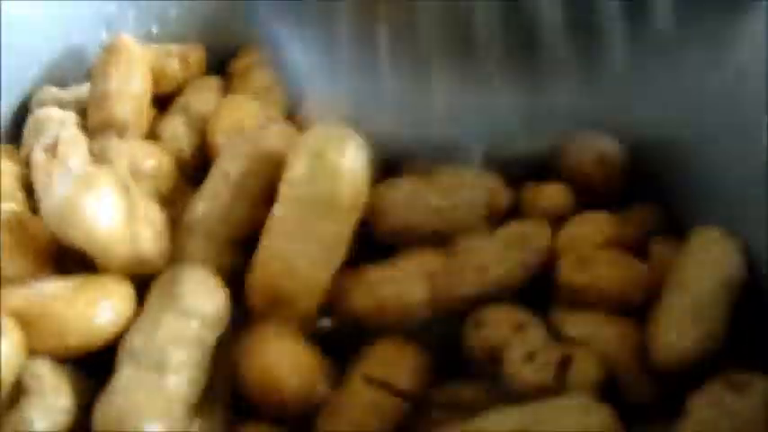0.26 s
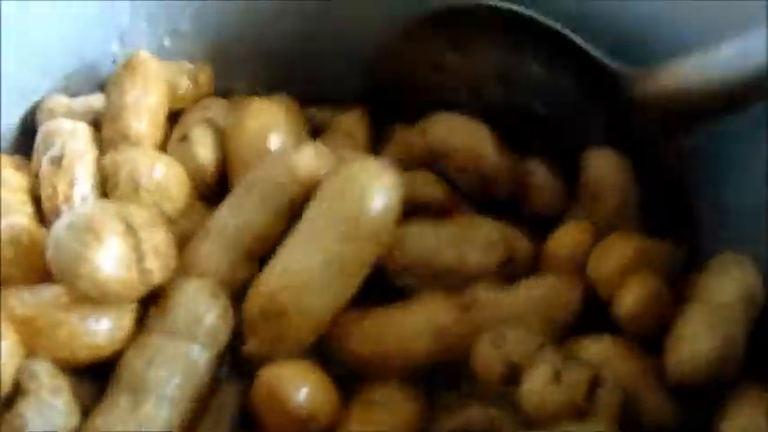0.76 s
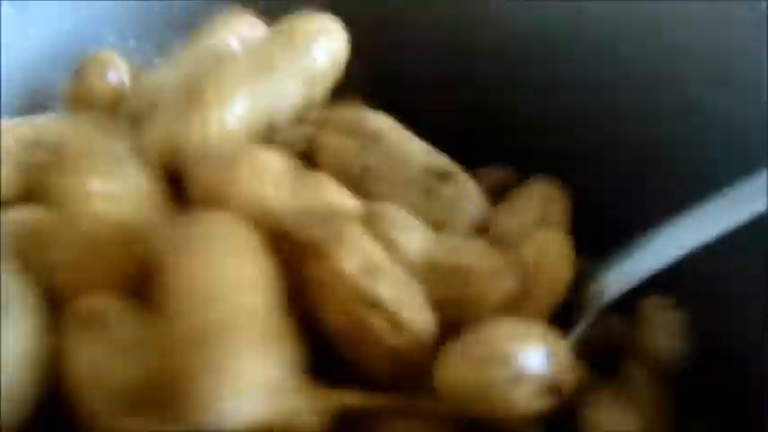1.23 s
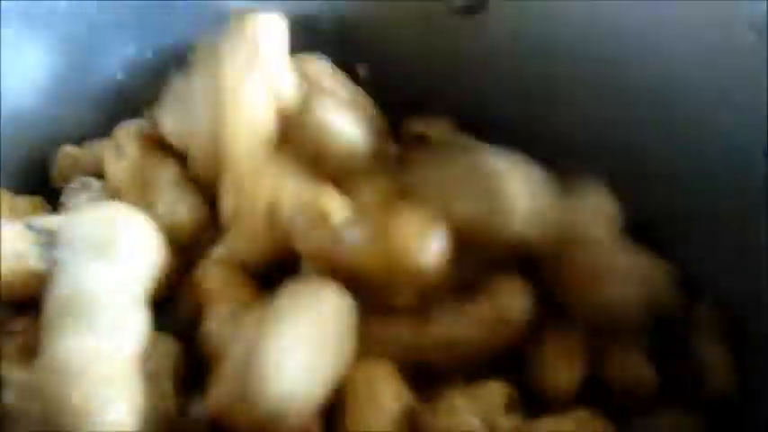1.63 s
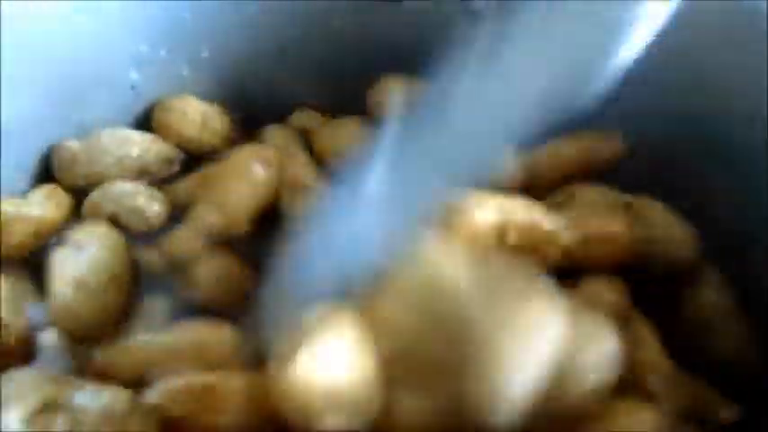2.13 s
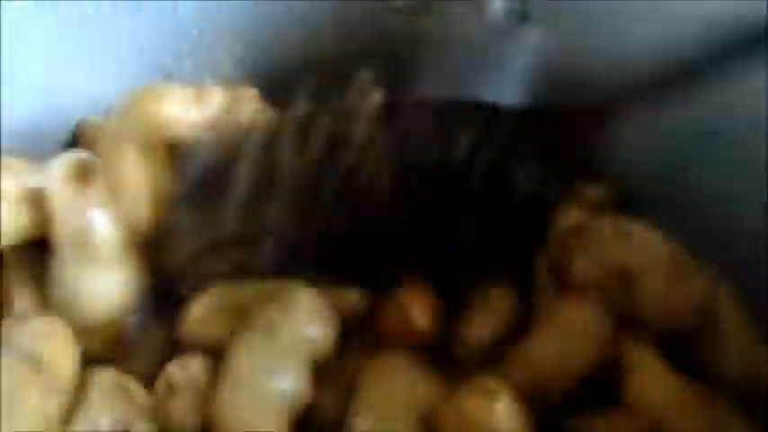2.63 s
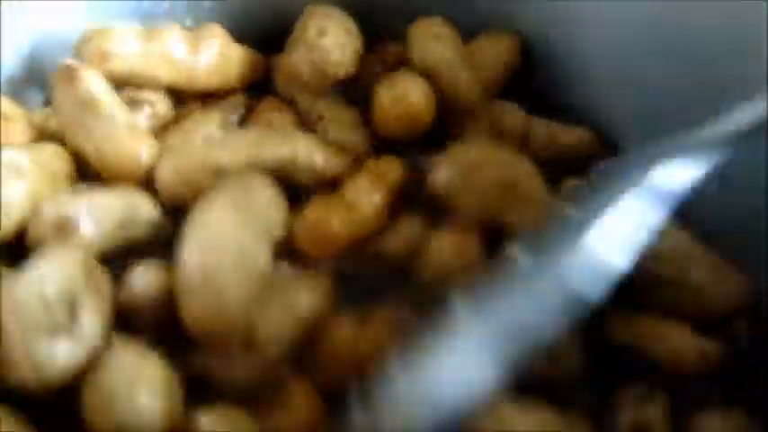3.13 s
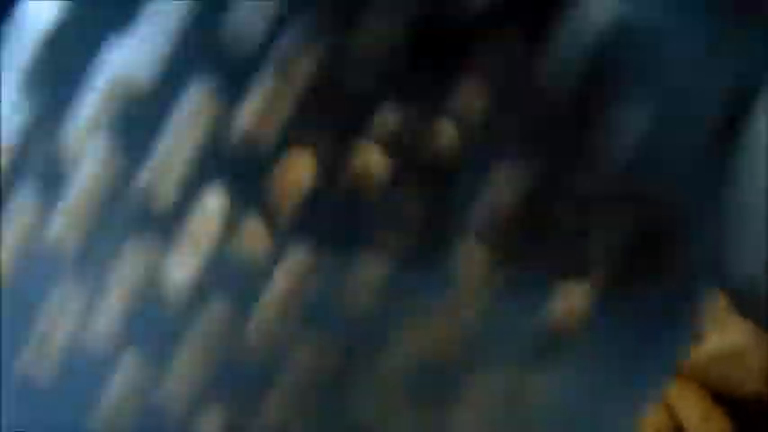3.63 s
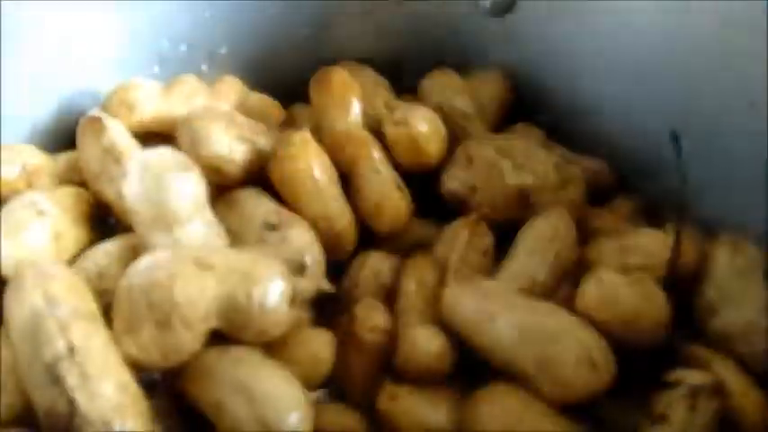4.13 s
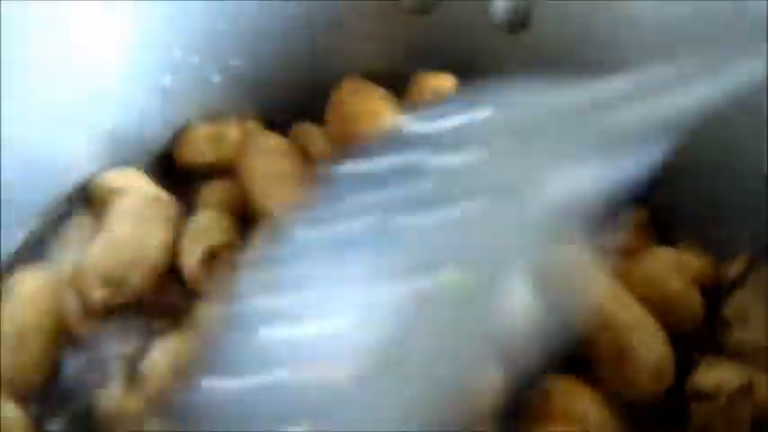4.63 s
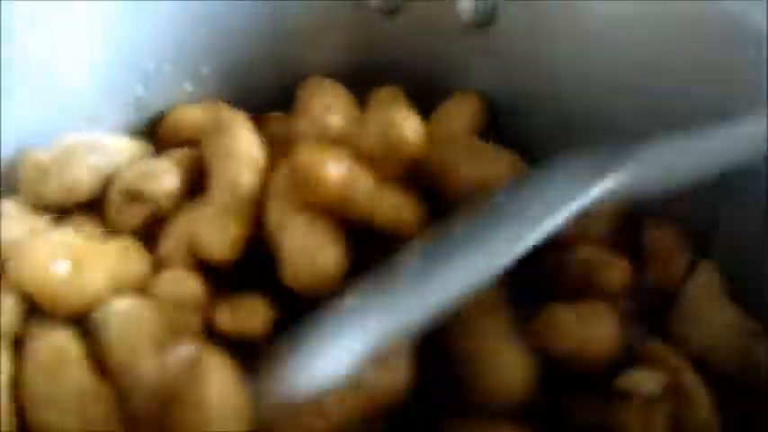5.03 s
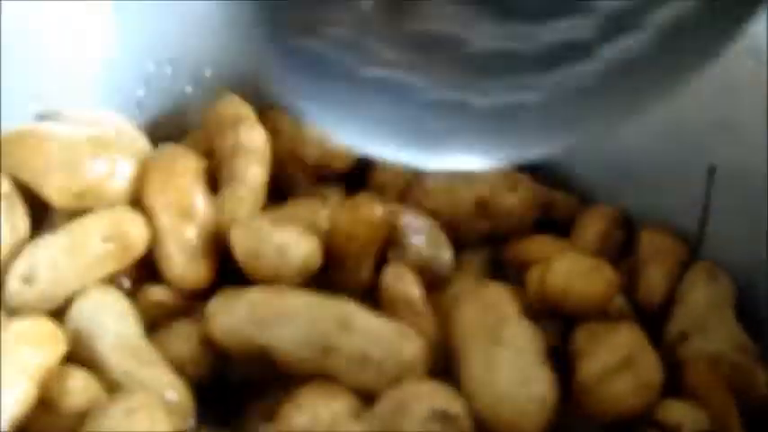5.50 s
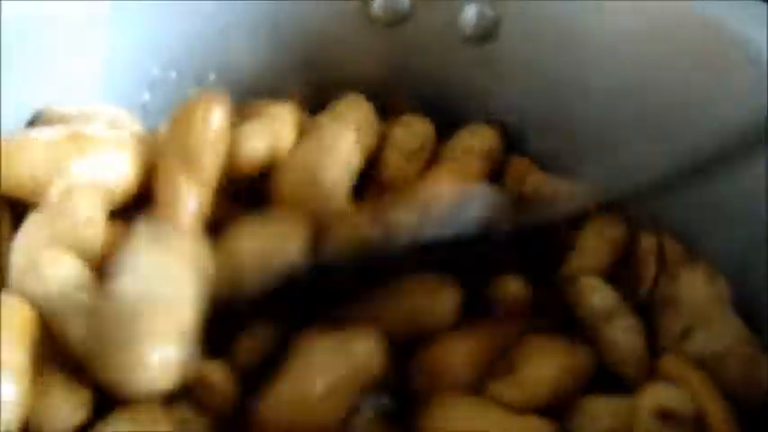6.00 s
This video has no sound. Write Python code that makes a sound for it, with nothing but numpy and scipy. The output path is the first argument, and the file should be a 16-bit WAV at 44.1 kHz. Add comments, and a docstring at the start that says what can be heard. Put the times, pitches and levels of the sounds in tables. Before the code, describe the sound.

Wet peanuts in their shells are stirred in a thin metal pot with a slotted metal spoon. Irregular strokes make grainy rattles and wet hisses; a very loud clang comes early, then softer stirring, two loud hollow knocks midway, another clank, and busy clustered knocking near the end. Close small microphone, slightly clipped, in a quiet kitchen.

```python
"""Wet peanuts in their shells rattle and hiss under a stirring spoon, and the thin metal pot hums low.
Hollow shells knock as short rings; the slotted metal spoon clangs on the wall as noise-driven modes.
Later come bright snaps of water film, each a tiny ring. Rattle and hiss are touches and noise that swell
with each stroke, the hum is a pair of wavering sines. A quiet kitchen lies behind: filtered noise and a
mains hum, with reflections on the blows. All of it is close to a small microphone."""
import sys
import numpy as np
from scipy import signal
from scipy.fft import rfft, irfft, next_fast_len
from scipy.io import wavfile

SR = 44100
rng = np.random.default_rng(int(sys.argv[2]) if len(sys.argv) > 2 else 0)


def materialize(psi):
    """Save the field psi as 16-bit PCM at rate SR to the path in sys.argv[1].

    A 1-D psi becomes a single channel; in a 2-D psi each row is a channel.
    """
    bounded = np.clip(np.atleast_2d(psi).T, -1, 1)
    quanta = np.round(bounded * 32767).astype(np.int16)
    wavfile.write(sys.argv[1], SR, quanta)


N = 276066

# Kitchen noise colours, relative: f/Hz, level/dB
ROOM_SPECTRUM = [(260, -47), (450, -8), (1060, -6), (1190, -4.5), (5190, -19.5), (13300, -23),
                 (14300, -28.5)]
RUMBLE_SPECTRUM = [(12, -28.5), (20, 7), (29, -10), (43, -13.5), (107, -16), (145, -21.5), (163, -13.5),
                   (203, -17.5), (232, -13.5), (264, -19.5), (450, -23), (580, -48.5), (990, -120)]
ROOM_DB, RUMBLE_DB = -66.5, -54.5
# Mains hum, level before it wavers: f/Hz, rms level/dB
MAINS_HUM = [(59, -79), (120, -67.5)]

# Spoon shoving the heap: full strength from t/s, hold/s, rattle level/dB, wet hiss level/dB
SHOVES = [(0.0, 0.022, -39.5, -46), (0.275, 0.033, -53.5, -60), (0.647, 0.049, -47.5, -54),
          (0.92, 0.045, -57, -56.5), (1.2, 0.07, -51.5, -58.5), (1.5, 0.013, -50, -57),
          (1.66, 0.042, -53.5, -57.5), (2.003, 0.16, -42.5, -47.5), (2.338, 0.079, -50, -52),
          (2.449, 0.06, -40, -46), (2.77, 0.031, -54.5, -62.5), (3.11, 0.031, -51, -55.5),
          (3.27, 0.13, -57.5, -62), (3.84, 0.031, -48, -48.5), (4.46, 0.07, -54, -55.5),
          (4.62, 0.062, -44, -49.5), (4.964, 0.069, -52, -46.5), (5.101, 0.096, -40, -46.5),
          (5.374, 0.09, -51, -55), (5.718, 0.042, -44, -45.5), (5.816, 0.013, -36, -46.5),
          (6.105, 0.039, -48.5, -50.5)]
SHOVE_RISE_DB_PER_S, SHOVE_FALL_DB_PER_S = (200, 200), (89.5, 78)  # rattle, hiss
# Colours of the shell rattle and the wet hiss, relative: f/Hz, level/dB
RATTLE_SPECTRUM = [(180, -44.5), (300, -4.5), (572, -9), (817, -2.5), (1750, -8.5), (2410, -17.5),
                   (3870, -19.5), (4710, -24), (7000, -27.5), (9100, -55.5), (15400, -120)]
HISS_SPECTRUM = [(1180, -35.5), (2000, -19), (2440, -0.5), (2940, -5.5), (3830, -8.5), (6230, -9.5),
                 (14300, -7)]
RATTLES_PER_S = 260  # before the density drifts

# Load jolting the pot into a hum: full strength from t/s, hold/s, upper level/dB, lower level/dB
JOLTS = [(0.0, .05, -43.5, -54), (0.05, 0.041, -46.5, -49.5), (0.66, 0.042, -55, -61.5),
         (1.0, 0.034, -59.5, -79), (1.55, 0.12, -59, -70), (1.75, 0.087, -61, -64),
         (2.09, 0.036, -53, -57.5), (2.4, .12, -49.5, -55), (2.53, 0.021, -47, -53),
         (3.1, 0.063, -53.5, -61), (3.23, 0.066, -54, -57.5), (3.77, .05, -53, -60),
         (4.45, 0.059, -61.5, -69), (4.65, 0.17, -57.5, -65.5), (4.95, .03, -56, -62),
         (5.07, 0.029, -50.5, -66), (5.15, 0.069, -58, -49), (5.4, 0.047, -58, -65),
         (5.78, 0.024, -41, -68), (5.84, 0.024, -39.5, -51), (6.15, 0.042, -65.5, -58)]
JOLT_RISE_DB_PER_S, JOLT_FALL_DB_PER_S = (700.5, 701.5), (89, 59.5)  # upper, lower hum
POT_HUM_HZ = (101, 237.5)  # the two low pot modes that hum
THUD_HZ, THUD_T60_S = 342, .075  # the pot mode that thuds

# Shells knocking: t/s, level/dB, shell f/Hz, then relative crack level/dB, tick level/dB, thud level/dB
KNOCKS = [(0.014, -26.5, 730, -13, -21, -9), (0.031, -30.5, 1400, 5.5, -22, -15),
          (0.07, -32.5, 651, -5, 3, -4), (0.244, -35.5, 920, -30, -26, -15),
          (0.691, -32.5, 690, -0.5, 8.5, -8), (0.74, -36, 727, -1, 4, -11), (1.161, -45, 734, 2, 0, -23),
          (1.394, -38, 1270, -36.5, -18.5, -15.5), (1.516, -35, 1220, -18, -9.5, -43),
          (1.66, -32, 914, -13, -29.5, -23), (1.695, -30, 1485, -16, -29.5, -26),
          (1.725, -36.5, 1400, -13, -26, -33), (1.878, -35.5, 1500, -25.5, -2.5, -22),
          (1.971, -30.5, 703, -21.5, -2, -25), (2.09, -19.5, 660, -18, -30, -6),
          (2.35, -49, 937, 11.5, -8, -17), (2.42, -38, 1050, -8, 7, -21), (2.451, -31, 710, -4, -12, -14),
          (2.464, -25.5, 1100, -15, -17, -3.5), (2.472, -16.5, 1160, 4.5, -2.5, -20),
          (2.486, -25.5, 1100, -9, -22, -31), (2.504, -38, 1000, 17.5, -6, -14),
          (2.533, -3, 827, -8, -44, -12.5), (2.569, -24.5, 800, -21.5, -7.5, 2),
          (2.825, -42, 1380, -19, -18.5, -20.5), (2.986, 0, 768, -9, -19.5, -25),
          (3.226, -18.5, 740, -34, -29.5, -4.5), (3.1345, -37.5, 937, -21, -29, -29.5),
          (3.705, -39, 900, -18, -24.5, -21.5), (3.766, -25, 595, -20.5, -30, -13),
          (4.624, -24.5, 703, -5, 0.5, -11), (4.929, -36, 1103, -1.5, -5, -17),
          (5.043, -31, 770, -22, -17, -17.5), (5.082, -38, 1100, -19, -21, -28),
          (5.105, -26.5, 1520, -14, -20, -27), (5.128, -26, 930, -8, -21, -20),
          (5.151, -21.5, 880, -20, -19, -26), (5.169, -25, 840, -11, -20, -22),
          (5.189, -29, 967, 5.5, -19, -29), (5.222, -28.5, 884, 0, -21, -24),
          (5.233, -35, 1410, 0, -10, -22), (5.374, -29.5, 1030, -28, -15, -19),
          (5.436, -37.5, 1310, -27, -12.5, -21.5), (5.681, -29.5, 926, -1.5, -3, -13.5),
          (5.725, -34.5, 1620, -2, 5.5, -25), (5.748, -31, 1030, -15, -21, -13),
          (5.776, -22, 726, -8.5, -27, -10), (5.829, -16, 1030, 1.5, -10, -34),
          (5.848, -23, 830, 3.5, -5, -25), (6.091, -39.5, 1010, -5.5, -17, -26),
          (6.241, -37, 1390, -15, -5.5, -8.5)]
KNOCK_CHATTER_S = .0015
SHELL_T60_S, SHELL_REFERENCE_DB = .034, -40  # ring time of a knock at the reference level
SHELL_DAMPS = .02  # octaves of ring time lost per dB above the reference
BODY_DB = -6  # broad body under the shell's ring
CRACK_HZ, CRACK_SPREAD_OCT = 2600, 0.083  # centre and spread of crack pitch

# Spoon on the pot wall: t/s, level/dB, then relative knock level/dB, brightness/dB,
# shiver level/dB, shiver t60/s (at least 0.02)
CLANGS = [(0.383, -45.5, -11, 7, -5, 0.13), (0.48, -0.5, -33, 6.5, -5.5, 0.056),
          (0.4968, 7.5, -45, 6, -13.5, 0.09), (0.504, 1.5, -34.5, 2, -11.5, .06),
          (0.5104, -4.5, -39, -0.5, -13, 0.1), (0.6631, -5.5, -15, 7, -6, 0.016),
          (0.8788, -26.5, -22, 5.5, -15, 0.1), (0.8865, -16, -23, -2, -18, .19),
          (0.948, -30, -33, -2, -5, 0.42), (1.045, -28, -23.5, -1.5, -12, .08),
          (2.088, -11.5, -2.5, -5, -6.5, .05), (2.3012, -20.5, -6.5, -6, -24, .071),
          (2.5107, -13.5, -31, -3.5, -15.5, 0.14), (2.7594, -32, 1.5, -2, -12, 0.087),
          (2.9891, -20, -2, 5.5, -20.5, 0.0974), (3.355, -30, -11.5, -8.5, -29, 0.058),
          (3.3623, -22, -28, -27.5, -16.5, .08), (3.7635, -1.5, -14, -22.5, -10.5, 0.098),
          (4.354, -29.5, -12, -9.5, -14.5, .06), (4.4533, -13.5, -8, -0.5, -11.5, 0.14),
          (4.6069, -38, -15, -7.5, -12, .087), (4.968, -20.5, -22, -1.5, -28.5, .061),
          (5.2505, -23, -14, -5, -15, 0.18), (5.4834, -30, -13, -1, -23, .08),
          (6.033, -31, -5.5, 2.5, -11, 0.071)]
# Spoon modes, t60 for a 0 dB blow: f/Hz, level/dB, t60/s
SPOON_MODES = [(1440, -8, .05), (2290, -16, .05), (2900, -8, .07), (3316, -11, .08), (3930, -8, .08),
               (4194, -3, .09), (4630, -13, .05), (5200, -11, .06), (5790, -5, .045), (5900, -7, .05),
               (6035, -5, .07), (6600, -7, .06), (7300, -10, .05), (7890, 0, .065), (8371, -8, .06),
               (8850, -8, .06), (9500, -10, .04), (10060, -9, .04), (10775, -3, .06), (11300, -11, .04),
               (12000, -11, .04), (12900, -8, .05), (13300, -4, .05), (13555, -4, .05), (13740, -7, .05)]
CLANG_CHATTER_S = 0.0017
RING_DB, RING_GROWS = -21, .12  # ring level at a 0 dB blow, dB gained per dB of blow
TILT_FOLLOWS = .7  # ring tilt per dB of brightness
RING_SHORTENS = .012  # octaves of ring time lost per dB below 0: light touches come from a buried spoon
WALL_DB, WALL_T60_S = -8.5, 0.059  # the wall's many modes

# Kitchen reflections: f/Hz, t60/s
KITCHEN_T60 = [(200, 0.65), (1000, 0.27), (4000, 0.39), (12000, 0.13)]
CLANG_ROOM_DB, KNOCK_ROOM_DB = -15.5, -23.5  # the deep pot shields the knocks

# Water films snapping: t/s, peak level/dB, f/Hz
SNAPS = [(1.2957, -40, 11600), (1.4277, -42.5, 13060), (1.592, -44, 7760), (1.632, -42, 8440),
         (1.7968, -38.5, 11000), (1.9274, -37, 13900), (2.1874, -34, 12900), (2.5835, -22, 14200),
         (2.7743, -34, 8260), (2.963, -39.5, 13230), (3.197, -36, 13900), (5.1616, -31, 12000),
         (5.6241, -46, 10600), (6.0835, -36, 12700), (6.1422, -35, 9200)]

MIC_HZ, CUTOFF_HZ = 14550, 15800  # where each steep low-pass reaches its full rejection


def from_db(db):
    """Turn dB into gain."""
    return 10 ** (np.asarray(db) / 20)


def rms_one(x):
    """Scale to rms 1."""
    return x / np.sqrt(np.mean(x ** 2) + 1e-20)


def peak_one(x):
    """Scale to peak 1."""
    return x / np.max(np.abs(x))


def at_hz(points, hz):
    """Read a table on a log-frequency axis."""
    points = np.array(points)
    return np.interp(np.log(hz), np.log(points[:, 0]), points[:, 1])


def colour(x, spectrum):
    """Shape a sound by a spectrum; rms 1."""
    size = next_fast_len(N)
    hz = np.maximum(np.arange(size // 2 + 1) * SR / size, 1)
    shaped = rfft(x, size) * from_db(at_hz(spectrum, hz))
    return rms_one(irfft(shaped, size)[:N])


def drift(rate_hz):
    """A slow random wander of rms 1: noise through two equal low-pass poles."""
    r = np.exp(-2 * np.pi * rate_hz / SR)
    noise = rng.standard_normal(N + SR)
    return rms_one(signal.lfilter([1], [1, -2 * r, r * r], noise)[SR:])  # skip the filter's start


def ring(x, hz, t60):
    """A resonant mode: a unit click sets a decaying sine of height 1 ringing."""
    r = from_db(-60 / (max(t60, .002) * SR))
    w = 2 * np.pi * min(hz, SR / 2.2) / SR
    return signal.lfilter([0, np.sin(w)], [1, -2 * r * np.cos(w), r * r], x + 1e-18)


def passed(x, hz, kind):
    """Second-order Butterworth design."""
    return signal.sosfilt(signal.butter(2, hz, kind, fs=SR, output="sos"), x)


def add(track, s, sound):
    """Mix a sound in at a time in seconds."""
    i = round(s * SR)
    track[i:i + len(sound)] += sound[:N - i]


def contact(length, size):
    """Chattering surfaces: a noise burst that holds briefly, then dies fast on a bell curve."""
    t = np.arange(size) / SR
    return rng.standard_normal(size) * np.exp(-(t / max(length, .0003)) ** 2)


def swells(rows, rise_db_per_s, fall_db_per_s):
    """Levels in dB over time: each row swells, holds and dies; their powers add."""
    t = np.arange(0, N + 64, 64) / SR
    power = 1e-30
    for s, hold, *levels in rows:
        rise_loss = np.outer(rise_db_per_s, np.maximum(s - t, 0))
        fall_loss = np.outer(fall_db_per_s, np.maximum(t - s - hold, 0))
        loss = rise_loss + fall_loss
        power = power + from_db(np.array(levels)[:, None] - loss) ** 2
    return [np.interp(np.arange(N) / SR, t, 10 * np.log10(row)) for row in power]


def background():
    """Quiet kitchen: low rumble, fine noise and a mains hum of slightly wavering level."""
    t = np.arange(N) / SR
    hum = sum(np.sqrt(2) * from_db(db + 1.6 * drift(7.1)) * np.sin(2 * np.pi * hz * t)
              for hz, db in MAINS_HUM)
    rumble = from_db(RUMBLE_DB) * colour(rng.standard_normal(N), RUMBLE_SPECTRUM)
    air = from_db(ROOM_DB) * colour(rng.standard_normal(N), ROOM_SPECTRUM)
    return air + rumble + hum


def touch_sizes(spread_db):
    """Uneven touches: random strength, capped, with either sign."""
    return from_db(spread_db * np.minimum(rng.exponential(1, N), 3)) * rng.choice([-1, 1], N)


def rattle(level_db):
    """Many small shell touches, each a short ring at one of 24 pitches, over a noisy rub."""
    sizes = touch_sizes(3.7)
    touches = sizes * (rng.random(N) < RATTLES_PER_S * from_db(4 * drift(10)) / SR)
    dealt = rng.integers(0, 24, N)  # which pitch each touch gets
    rings = np.zeros(N)
    for k, hz in enumerate(np.geomspace(400, 6500, 24)):
        gain = from_db(at_hz(RATTLE_SPECTRUM, hz) + 6.6 * np.log2(hz))  # lifts the shorter high rings
        rings += gain * ring(touches * (dealt == k), hz, 12.0 / hz)
    rub = colour(rng.standard_normal(N), RATTLE_SPECTRUM) * from_db(3.5 * drift(30))
    return from_db(level_db) * rms_one(rms_one(rings) + .9 * rub)


def hiss(level_db):
    """Wet surfaces slide: bright noise, and a fine crackle of drops as clicks and tiny rings."""
    sizes = touch_sizes(4.2)
    drops = sizes * (rng.random(N) < 150 / SR)
    dealt = rng.integers(0, 12, N)
    pops = sum(ring(drops * (dealt == k), hz, .005)
               for k, hz in enumerate(np.geomspace(3500, 13500, 12)))
    ticks = sizes * (rng.random(N) < 200 / SR)
    slide = rng.standard_normal(N) * from_db(1.0 * drift(30))
    return from_db(level_db) * colour(slide + 0.46 * rms_one(ticks) + 0.14 * rms_one(pops), HISS_SPECTRUM)


def pot_hum(low_db, high_db):
    """Two low pot modes under the stirred load: sines whose phase and level wander."""
    t = np.arange(N) / SR
    low, high = (np.sqrt(2) * np.sin(2 * np.pi * hz * t + .7 * drift(3)) * from_db(1.5 * drift(8))
                 for hz in POT_HUM_HZ)
    return from_db(low_db) * low + from_db(high_db) * high


def knocks():
    """A hollow shell rings a few cycles, with a short crack and tick; the thud goes into the pot."""
    out = np.zeros(N)
    for s, level_db, shell_hz, crack_db, tick_db, thud_db in KNOCKS:
        t60 = SHELL_T60_S / 2 ** (SHELL_DAMPS * (level_db - SHELL_REFERENCE_DB))
        touch = contact(KNOCK_CHATTER_S, size=SR // 4)
        touch += .18 * np.roll(touch, round(rng.uniform(0.0022, 0.006) * SR))  # a small bounce

        shell = peak_one(ring(touch, shell_hz, t60) + .55 * ring(touch, shell_hz * 1.55, t60 * 0.5))
        body = peak_one(passed(touch, [shell_hz * .75, shell_hz * 2.1], "band"))
        crack_hz = CRACK_HZ * 2 ** (CRACK_SPREAD_OCT * rng.standard_normal())
        crack = peak_one(ring(touch, crack_hz, t60 * .2))
        crack += .8 * peak_one(passed(touch, [1200, 4200], "band"))
        tick = peak_one(passed(contact(KNOCK_CHATTER_S * 2.0, size=SR // 4), 5000, "high"))
        thud = peak_one(ring(passed(touch, 1300, "low"), THUD_HZ, THUD_T60_S))

        knock = shell + from_db(BODY_DB) * body + from_db(crack_db) * crack
        knock += from_db(tick_db) * tick + from_db(thud_db) * thud
        add(out, s, from_db(level_db) * knock)
    return out


def clang_ring(drive, level_db, bright_db):
    """Metal modes driven by the blow: the spoon's own, and a random wall set for each spot struck."""
    metal = np.zeros(len(drive))
    for hz, db, t60 in SPOON_MODES:
        mode_db = db + rng.normal(0, 2.5) + TILT_FOLLOWS * bright_db * hz / 14000
        mode_t60 = t60 * 2 ** (RING_SHORTENS * level_db)
        metal += from_db(mode_db) * peak_one(ring(drive, hz, mode_t60))
    for hz in rng.uniform(2500, 14000, 30):
        metal += from_db(WALL_DB) * peak_one(ring(drive, hz, WALL_T60_S))
    return from_db(RING_DB + RING_GROWS * level_db) * metal


def clangs():
    """Each blow is a broad crack and the thin wall's dense shiver, which keeps the spoon's modes going."""
    out = np.zeros(N)
    t = np.arange(SR // 4) / SR
    for s, level_db, knock_db, bright_db, shiver_db, shiver_t60 in CLANGS:
        touch = contact(CLANG_CHATTER_S, size=SR // 4)
        shiver = passed(rng.standard_normal(SR // 4), 780, "high")
        shiver *= from_db(-60 * t / max(shiver_t60, .02))
        drive = touch + from_db(shiver_db) * shiver

        crack = peak_one(passed(drive, [2300, 6500], "band"))
        crack += from_db(bright_db + 7.0) * peak_one(passed(drive, 6000, "high"))
        knock = from_db(knock_db) * peak_one(passed(drive, [900, 2500], "band"))
        metal = clang_ring(drive, level_db, bright_db)
        add(out, s, from_db(level_db) * (0.52 * crack + knock + metal))
    return out


def kitchen(x):
    """Reflections: octave bands of noise, each dying at its own rate after a short gap."""
    t = np.arange(SR) / SR
    edges = 150 * 2. ** np.arange(8)
    echo = np.zeros(SR)
    for low, high in zip(edges, edges[1:]):
        band = passed(rng.standard_normal(SR), [low, high], "band")
        echo += band * from_db(-60 * t / at_hz(KITCHEN_T60, low * np.sqrt(2)))
    echo *= np.clip((t - .004) / .012, 0, 1)  # silent gap, then a fade-in
    return signal.fftconvolve(x, echo / np.sqrt(np.sum(echo ** 2)))[:N]


def snaps():
    """Each water film snaps as a tiny bright ring excited by a very short noise burst."""
    out = np.zeros(N)
    for s, peak_db, hz in SNAPS:
        snap = peak_one(ring(contact(0.00061, size=SR // 20), hz, 0.0049))
        add(out, s, from_db(peak_db) * snap)
    return out


def scene():
    """Blows with their room, the stroke and the background."""
    rattle_db, hiss_db = swells(SHOVES, SHOVE_RISE_DB_PER_S, SHOVE_FALL_DB_PER_S)
    high_db, low_db = swells(JOLTS, JOLT_RISE_DB_PER_S, JOLT_FALL_DB_PER_S)
    metal, shells = clangs(), knocks()
    room_feed = from_db(CLANG_ROOM_DB) * metal + from_db(KNOCK_ROOM_DB) * passed(shells, 900, "high")
    blows = passed(metal + shells + kitchen(room_feed), 230, "high")
    stroke = rattle(rattle_db) + hiss(hiss_db) + snaps() + pot_hum(low_db, high_db)
    return (blows + stroke + background())[None]


def record(dry):
    """The microphone band ends steeply, peaks beyond full scale clip, then the top is cut."""
    mic_band = signal.cheby2(14, 45, MIC_HZ, fs=SR, output="sos")
    top_cut = signal.cheby2(12, 60, CUTOFF_HZ, fs=SR, output="sos")
    clipped = np.clip(signal.sosfilt(mic_band, dry), -1, 1)
    return signal.sosfilt(top_cut, clipped)


dry = scene()
out = record(dry)
materialize(out)
```